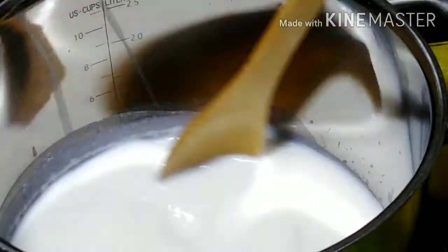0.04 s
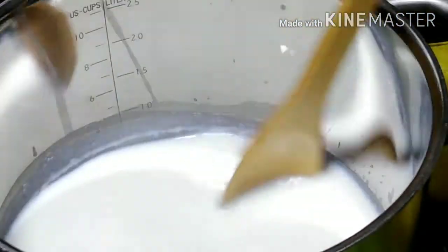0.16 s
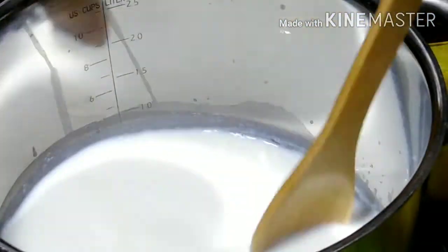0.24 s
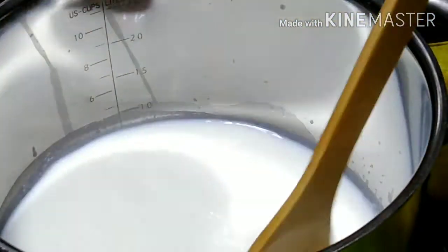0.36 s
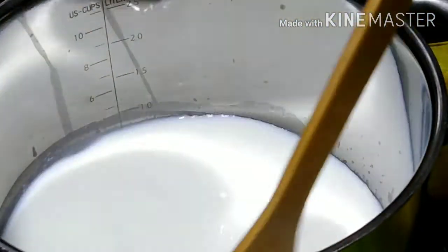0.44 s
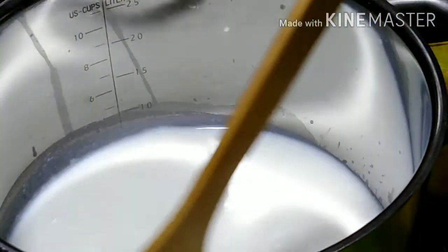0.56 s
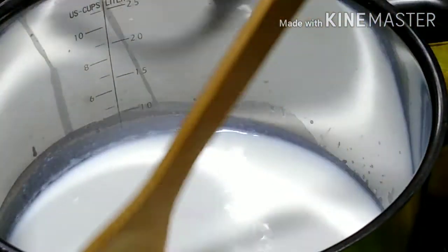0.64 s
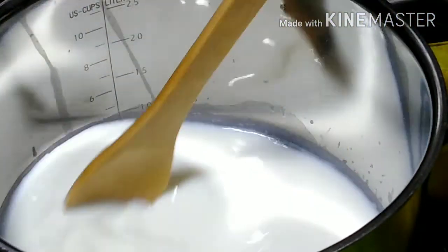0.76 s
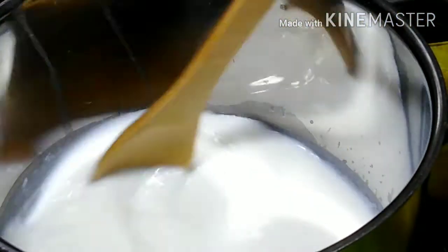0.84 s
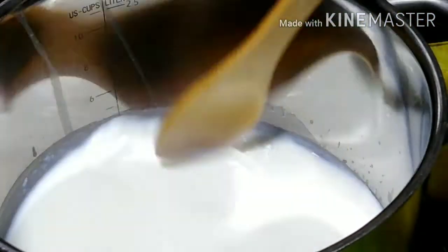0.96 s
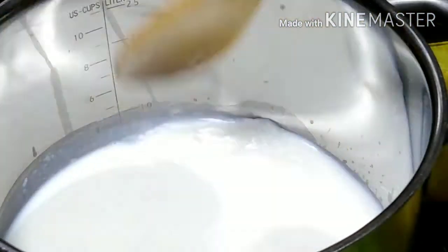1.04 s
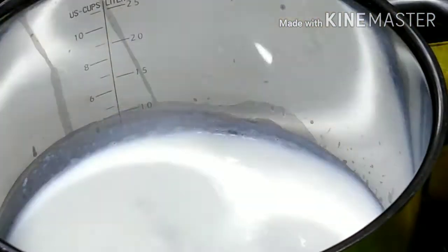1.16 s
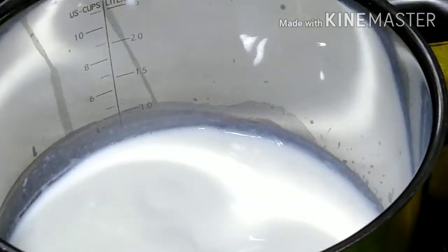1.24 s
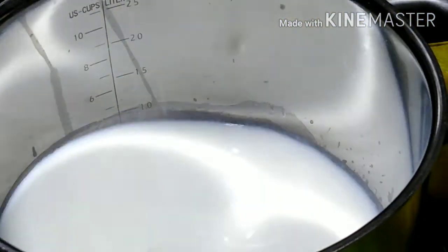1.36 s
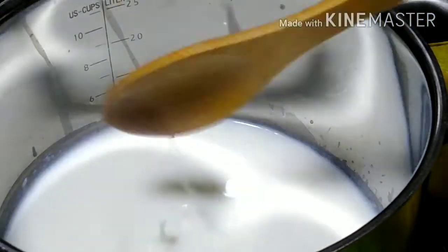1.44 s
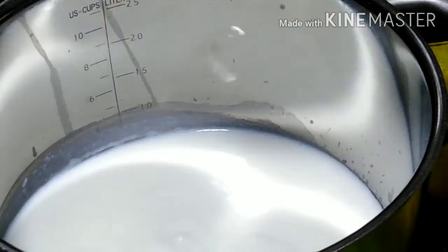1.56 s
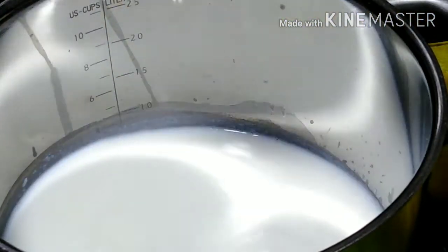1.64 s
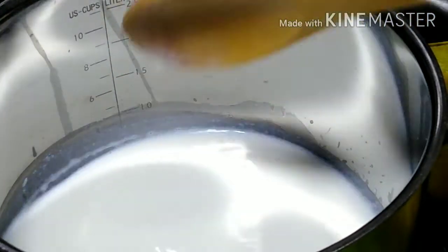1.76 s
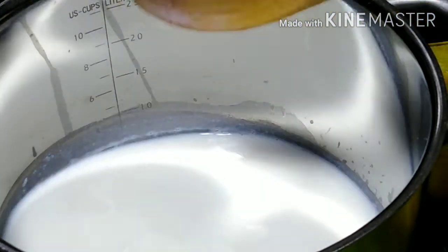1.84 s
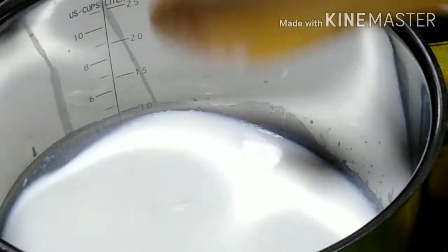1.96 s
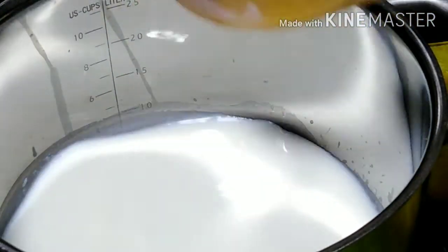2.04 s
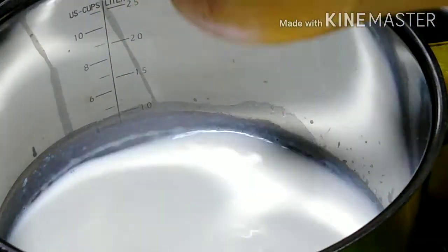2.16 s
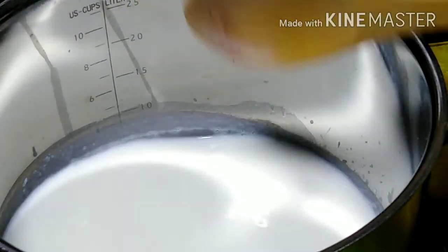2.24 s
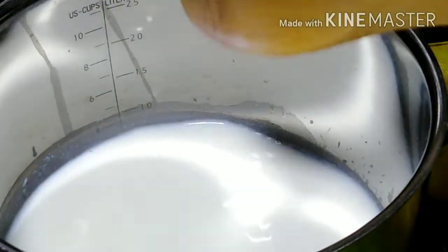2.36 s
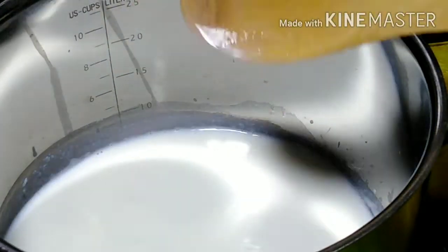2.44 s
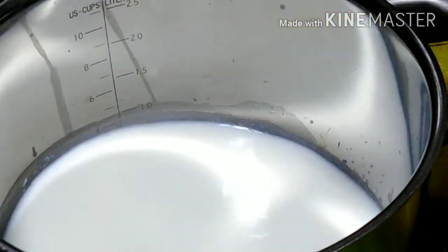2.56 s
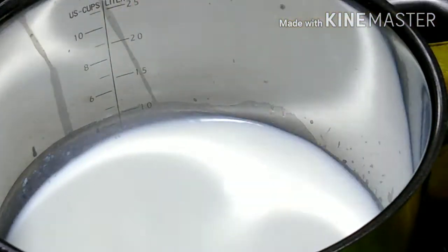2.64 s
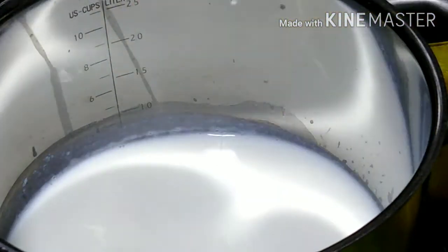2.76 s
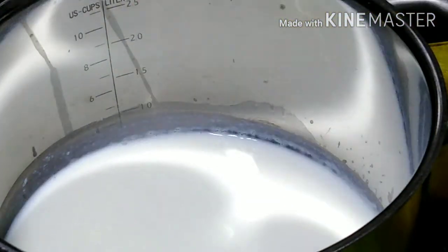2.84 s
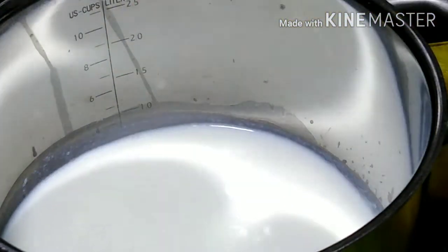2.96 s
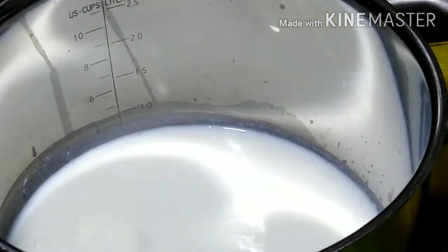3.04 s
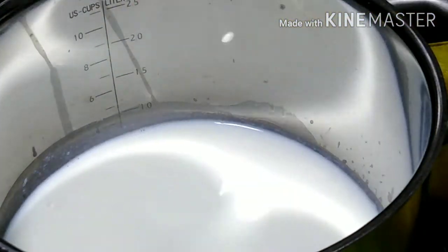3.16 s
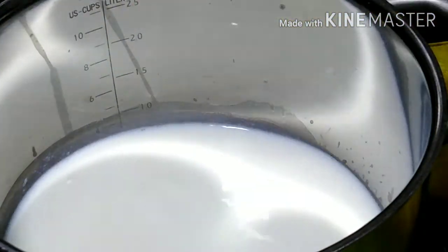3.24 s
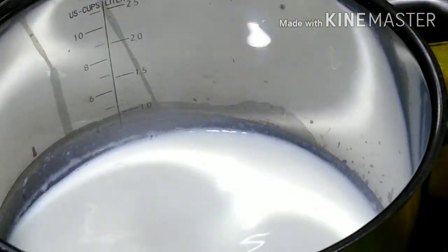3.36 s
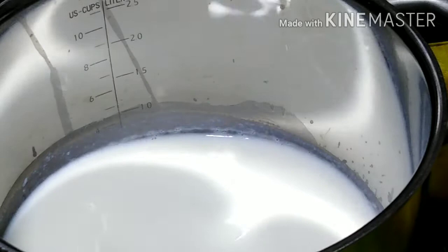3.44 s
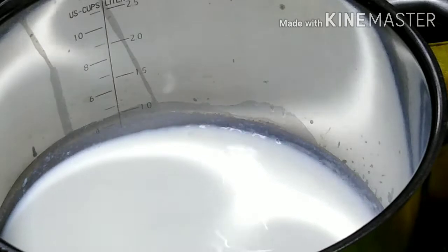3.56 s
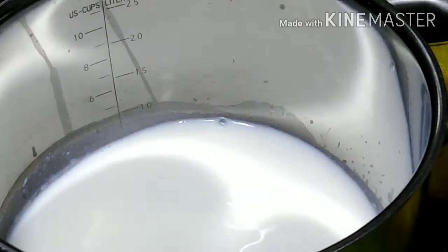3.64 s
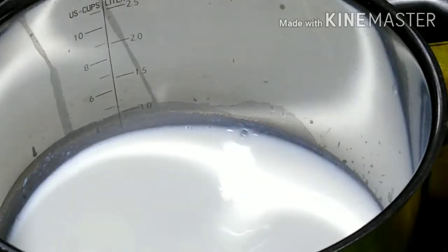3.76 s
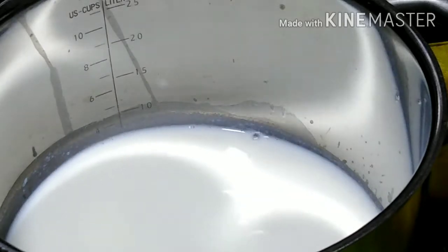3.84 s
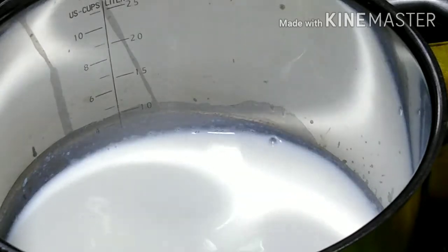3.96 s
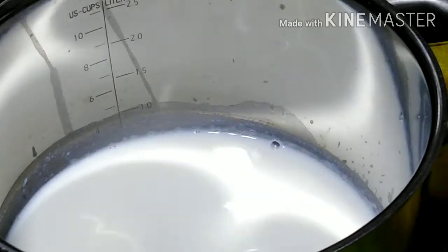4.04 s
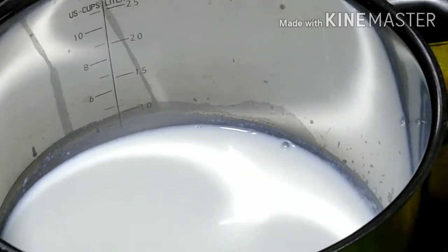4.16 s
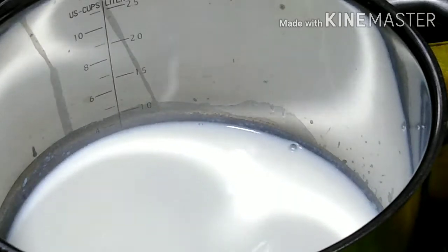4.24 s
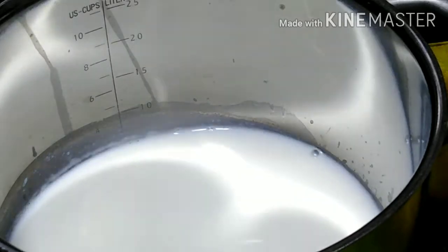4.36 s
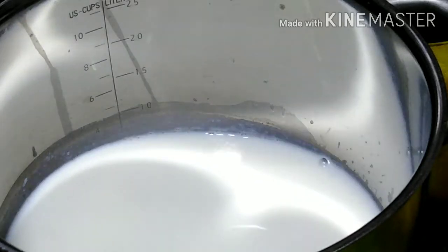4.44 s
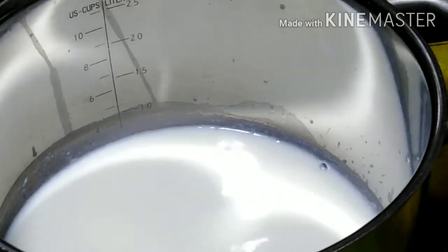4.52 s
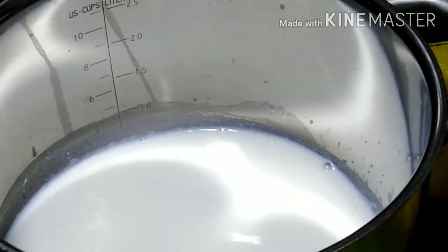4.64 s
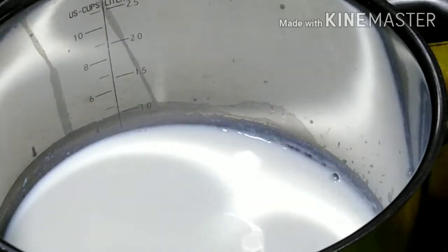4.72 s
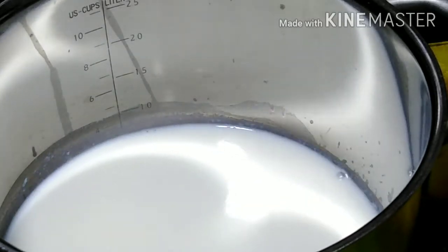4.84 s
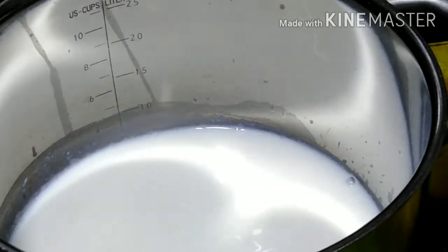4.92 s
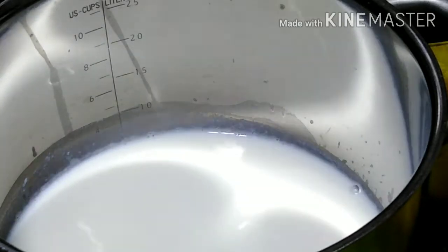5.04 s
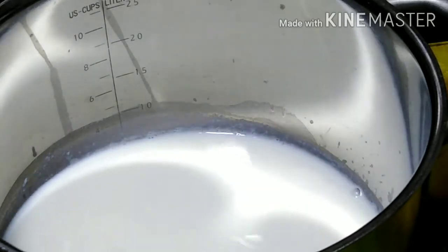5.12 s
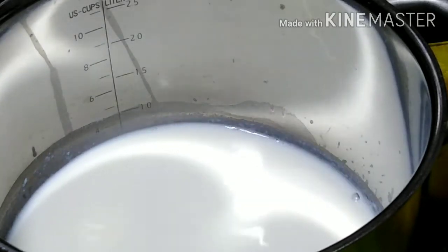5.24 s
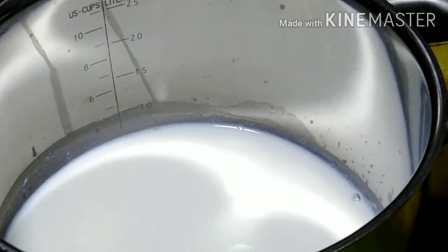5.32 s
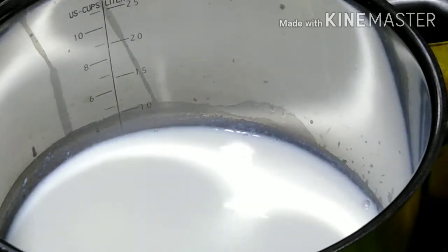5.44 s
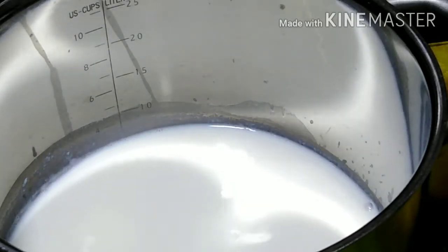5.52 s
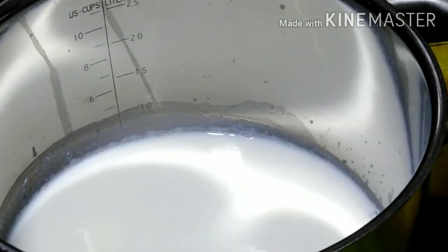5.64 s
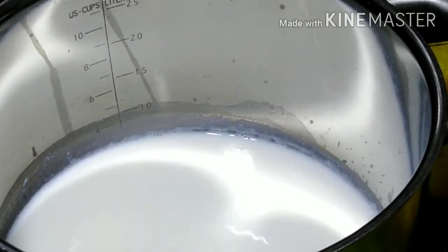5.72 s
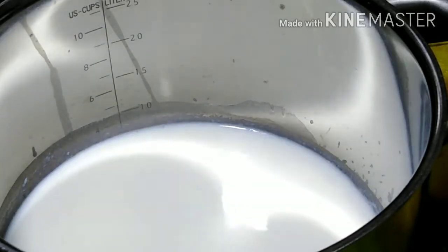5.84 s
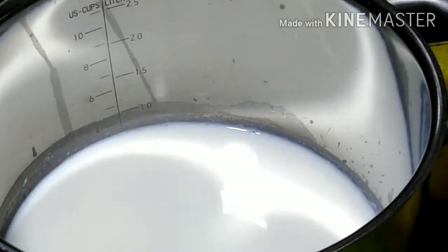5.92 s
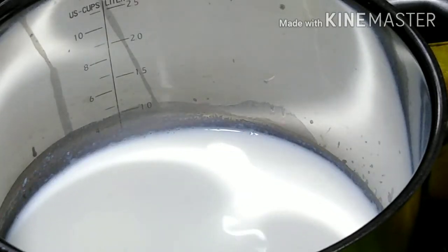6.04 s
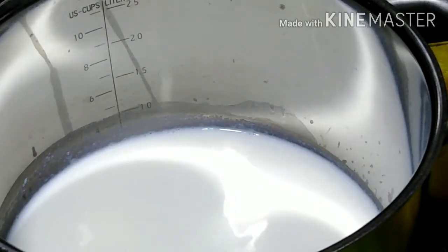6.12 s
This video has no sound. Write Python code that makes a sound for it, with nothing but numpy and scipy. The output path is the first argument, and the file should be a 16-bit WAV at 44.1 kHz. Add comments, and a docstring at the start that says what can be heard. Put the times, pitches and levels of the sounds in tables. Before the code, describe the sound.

A quiet kitchen stove heard close up in stereo, with a short room echo. A low machine drone throbs about twenty times a second throughout, slightly stronger in the first two seconds, while a thin whistle around 5.6 kHz wavers and flickers over soft air. A wooden spoon knocks a steel pot at about 0, 0.17 and 0.3 seconds, duller at first, then brighter and more ringing at 0.8, 1.0, 1.3 to 1.4, 1.6 and 1.8 to 1.9, with a faint last tap at 2.4. Drops fizz very briefly around 0.15 and again at 1.2 to 1.6; tiny high clinks appear near 1.2 to 1.3, and fainter ones before 2. From 2.6 to 3.9 the spoon scrapes in small gritty touches, sharpest with a click at 3.0, another at 3.65. Afterwards mainly drone and whistle remain, with faint blurred tones and one barely audible knock at 5.7.

```python
"""Knocks of a wooden spoon on a steel pot of milk, drops that fizz on the lit stove, then the spoon scraped and laid down.
A low machine drone throbs through the kitchen, and a thin whistle near the burner wavers the whole time.
Knocks and clinks are decaying sines, with thud and tick noise on the pot; fizzes and scrapes are swells cut from noise.
The drone is noise with fuzzy tones, the whistle a wandering sine mixed with narrow noise; soft air lies behind."""
import sys
import numpy as np
from scipy import signal
from scipy.fft import rfft, irfft
from scipy.io import wavfile
from scipy.ndimage import uniform_filter1d

SR = 44100
rng = np.random.default_rng(int(sys.argv[2]) if len(sys.argv) > 2 else 0)


def inscribe(sig):
    """Save sig as 16-bit PCM at rate SR to the path in sys.argv[1].

    A 1-D sig is mono; a 2-D sig holds one channel per row.
    Samples are clipped to [-1, 1] before scaling.
    """
    pcm = np.round(np.clip(np.atleast_2d(sig).T, -1, 1) * 32767)
    wavfile.write(sys.argv[1], SR, pcm.astype(np.int16))


N = 272802

# Spoon blows on the pot. Each row: time in seconds, level in dB, lowest modes in dB, upper modes in dB,
# left-right difference in dB.
KNOCKS = [(.004, -57.5, -6, -25, 14), (.17, -42, 2, -47, 0), (.297, -53, -1, -26, -4),
          (.7755, -47, 3, 5.5, -2.5), (1.005, -49.5, -3.5, -12, -5), (1.3135, -47, 6.5, 5.5, -1.5),
          (1.3865, -49, 1.5, 4, -0.5), (1.628, -50, -3.5, -7.5, 3.5), (1.816, -64, -5, 4, -12),
          (1.826, -43, -9, -15, 2), (1.893, -49, -12, -12, 0), (2.387, -57, -6, -30, 0),
          (5.735, -64.5, -11, -20, 15)]
# Modes of the steel pot. Each row: frequency in Hz, level in dB, t60 in seconds before the blow scales it.
POT_MODES = [(473, 1.5, 0.18), (749, -4, 0.27), (766, -11, 0.2), (794, -8.5, 0.28), (910, 2.5, 0.06),
             (962, -6, 0.054), (993, -14, 0.14), (1288, -2, 0.092), (1517, 7.5, 0.11), (1600, -22, 0.091),
             (1777, 1.5, 0.095), (1686, -9.5, 0.14), (1990, 4, 0.04), (2070, 3, 0.059), (2138, 2, 0.034),
             (2173, -1, 0.072), (2256, -12, 0.16), (2700, -15.5, 0.087), (2980, -21, 0.095),
             (3330, -8.5, 0.094), (3460, -19, 0.1), (3560, -17, 0.082), (5060, -20, 0.078),
             (5840, -11.5, 0.069)]
# Spectrum of the wooden thud. Each row: frequency in Hz, density in dB per Hz.
WOOD_SPECTRUM = [(400, -11), (700, 13.5), (1100, -7), (2100, -11), (2500, -12), (3500, -9), (4200, -38),
                 (5200, -9), (7000, -47)]
SOFT_RISE_S, HARD_RISE_S = 0.0045, 0.0031  # blows rich in upper modes start faster
SOFT_RING, HARD_RING = 0.51, 0.88  # and ring longer: factors on the t60 of the pot
CRACK_DB, CRACK_T60_S = -10, 0.023  # tick of first contact, relative to the upper modes

# Short bright fizzes of the drops. Each row: time in seconds, level in dB, length in seconds,
# tilt in dB per octave.
FIZZES = [(.113, -60, .02, -2), (.13, -48, .045, -2.5), (.165, -53, 0.0093, -12), (1.203, -70, 0.029, -1),
          (1.25, -66, 0.056, -6), (1.476, -51.5, .02, 4), (1.492, -51, 0.031, -4),
          (1.544, -45.5, 0.02, -5.5), (1.585, -62.5, .04, -4)]
# Spectrum of the fizz before tilt and bend. Each row: frequency in Hz, density in dB per Hz.
FIZZ_SPECTRUM = [(1500, -29), (2200, -27), (3000, -7), (3600, -11), (4300, -3), (5000, -1), (5900, -14),
                 (6600, 6.5), (9000, 2), (12500, 1), (14400, 0)]
# Envelope of a fizz: rise and tail t60 as multiples of the length, bend in dB per octave squared.
FIZZ_SHAPE = 0.41, 6.25, -0.6

# The spoon dragged and set down. Each row: time in seconds, level in dB, length in seconds,
# tilt in dB per octave.
SCRAPES = [(2.57, -72.5, 0.075, 7.5), (2.855, -70, 0.1, -0.5), (2.955, -61.5, 0.043, 6),
           (2.986, -46.5, 0.0012, -1), (2.996, -52.5, 0.032, -5.5), (3.039, -58.5, 0.052, 1),
           (3.12, -65, 0.054, 2.5), (3.225, -65.5, 0.046, 7), (3.258, -58, 0.032, 4.5),
           (3.375, -75.5, 0.031, 5), (3.645, -55.5, 0.036, -6), (3.75, -70, 0.037, 4),
           (3.895, -75, 0.016, -1.5)]
# Spectrum of the friction before tilt and bend. Each row: frequency in Hz, density in dB per Hz.
SCRAPE_SPECTRUM = [(530, -56), (900, -7), (1200, -10), (1420, -0.5), (1610, -12), (2100, -3), (2800, 0),
                   (4630, -4), (5570, -18), (6260, -2), (8460, -4.5), (9400, -15.5), (13600, -19),
                   (14400, -41)]
# Envelope of a scrape: rise and tail t60 as multiples of the length, bend in dB per octave squared.
SCRAPE_SHAPE = 0.29, 8.3, 2.7
# Resonances the scrape rings in. Each row: frequency in Hz, width of each smoothing pass in Hz,
# relative level in dB.
BOARD_RESONANCES = [(1402, 35, -19), (2094, 97, 12.5), (2920, 130, -15), (3295, 35, 6.5), (4240, 90, -33),
                    (5200, 74, 3), (7030, 82, -1), (7600, 100, 3)]
GRIT_DB, GRIT_S = 2, 0.003  # crackle of the friction: rms swing, time scale

# Faint high clinks. Each row: time in seconds, level in dB, extra level of the highest modes in dB.
CLINKS = [(1.2074, -61.5, -13), (1.2316, -60, -15), (1.253, -60, -10), (1.299, -62.5, -14),
          (1.7355, -71, -22), (1.971, -68.5, -7)]
# Modes all clinks share. Each row: frequency in Hz, relative level in dB, t60 in seconds.
CLINK_MODES = [(6430, -6, 0.079), (6940, -19, 0.084), (7500, -19, .1), (8660, -3.5, 0.044),
               (10200, -3, 0.074), (10500, -1, 0.064), (10440, -18, .15), (10800, -14, 0.13),
               (12550, 0, 0.13), (12900, 8, 0.069), (13800, 4, 0.11), (14050, -2, 0.17)]
# Faint short blurred tones; the low ones are brief swells at the drone's upper edge.
# Each row: time in seconds, level in dB, centre pitch in Hz.
BLURRED_TONES = [(.165, -47, 6200), (3.001, -54, 1421), (3.1, -64, 694), (3.75, -64, 3390),
                 (4.15, -54, 620), (4.4, -53.5, 610), (4.98, -59, 6380), (5.19, -67, 715), (5.26, -70, 704),
                 (5.67, -65.5, 704), (6.05, -62, 1143), (6.1, -56, 714.4), (6.16, -67, 1170)]
# Ring time of the blurred tones. Each row: frequency in Hz, t60 in seconds.
BLURRED_T60 = [(650, 0.26), (1160, 0.086), (1400, 0.15), (6300, 0.084)]
BLUR_HZ = 28.2  # random spread of the close sines in each blurred tone

# Spectrum of the drone wash. Each row: frequency in Hz, density in dB per Hz.
DRONE_SPECTRUM = [(28, -18), (48, -26), (66, -12), (100, -8), (130, -4), (160, -12), (290, -15), (330, -19),
                  (385, -13), (440, -18), (520, -12), (600, -19), (660, -36), (780, -52), (1100, -70)]
# Level of the wash before it throbs. Each row: time in seconds, level in dB.
DRONE_LEVEL = [(0, -47.5), (1.9, -47), (2.2, -50.5), (3, -49), (4, -50), (5.3, -49), (6.19, -49)]
# Likeness of the drone in the two channels. Each row: frequency in Hz, likeness from 0 to 1.
DRONE_LIKENESS = [(60, 1), (130, 0.94), (280, 0.81), (620, 0.75), (1350, 0.17), (2950, 0.05), (6420, 0.24),
                  (14000, 0.022)]
# Fuzzy tones in the drone. Each row: frequency in Hz, width of each smoothing pass in Hz, rms level in dB.
DRONE_TONES = [(77.37, 2.72, -52.5), (98.2, 6.1, -59.5), (120, 6.3, -57), (124.18, 3.97, -54),
               (264.2, 8.5, -67), (299.5, 3.8, -68.5), (373.5, 3.34, -66.5), (391.8, 5.1, -62),
               (497, 4.5, -74), (484, 5.4, -71.5), (518, 6, -73.5), (531, 4.6, -71), (610, 8.3, -79)]
THROB_HZ, THROB_DEPTH = 19.45, 0.29  # the wash beats once per turn of the machine
THIRD_ORDER_DB = -50.5  # peak of a clean tone at three times the turning rate

# Path of the whistle. Each row: time in seconds, pitch in Hz before it wanders,
# level in dB before flicker and left-right balance.
WHISTLE = [(0, 5640, -68), (.2, 5590, -62), (.3, 5580, -75.5), (.56, 5600, -77.5), (.66, 5640, -63),
           (1.0, 5650, -68.5), (1.14, 5600, -76.5), (1.28, 5600, -64), (1.52, 5500, -71), (1.75, 5590, -62),
           (2.2, 5590, -67.5), (2.55, 5560, -80), (2.72, 5620, -70.5), (3.12, 5560, -69.5),
           (3.21, 5540, -76), (3.3, 5560, -55.5), (3.48, 5680, -74.5), (3.63, 5590, -60.5),
           (3.8, 5520, -86), (3.92, 5670, -66), (4.2, 5610, -74.5), (4.3, 5770, -77), (4.62, 5720, -65.5),
           (4.95, 5650, -62.5), (5.3, 5730, -68), (5.5, 5760, -63.5), (5.75, 5650, -62.5),
           (6.19, 5560, -62.5)]
# Fainter strands beside the whistle. Each row: frequency in Hz, width of each smoothing pass in Hz,
# level in dB relative to the whistle path, swing in dB.
STRANDS = [(5480, 73, -25, 15.5), (5984, 81, -23, 12)]
# Short narrow noise tones, mostly just below the whistle, one faint and high.
# Each row: start in seconds, length in seconds, frequency in Hz, level in dB before fades and left-right balance.
NARROW_TONES = [(1.265, 0.56, 5430, -82), (2.493, 0.048, 5340, -73.5), (2.948, 0.24, 5470, -70),
                (3.247, 0.26, 5470, -76), (4.419, .33, 5465, -70.5), (4.9, 0.11, 5090, -79),
                (5.13, 0.19, 5390, -74.5), (5.24, 0.21, 5490, -75), (5.377, 0.13, 5410, -75),
                (5.678, .14, 5070, -82), (5.82, 0.39, 10900, -86)]
WANDER_HZ, WANDER_S = 24.98, 0.0519  # quick unsteadiness of the pitch: rms swing, time scale
FLICKER_DB, FLICKER_S = 3.5, 0.036  # quick level changes: rms swing, time scale
STRAND_S = 0.13  # time scale on which a strand comes and goes

# Spectrum of the background air. Each row: frequency in Hz, density in dB per Hz.
AIR_SPECTRUM = [(500, -2), (800, -4), (1250, -2.5), (1600, -6), (3400, -13), (5000, -12), (5700, -5),
                (6700, -14), (13000, -16), (14400, -19.5)]
AIR_DB = -74.5  # rms

# Colour of the microphone pair. Each row: frequency in Hz, left-right difference in dB.
PORTS = [(60, -1.5), (110, -0.5), (200, 1), (370, 2), (680, 4.5), (1240, 0), (2270, -4), (4170, 5.5),
         (7630, 7.5), (14000, -16)]
EDGE_HZ = 14250  # upper band limit


def pot():
    """Each knock rings the same modes over a wooden thud; place and hardness set the low and high shares."""
    out, t = np.zeros((2, N)), np.arange(SR // 2) / SR
    hz, db, t60 = np.transpose(POT_MODES)
    wood = noise(WOOD_SPECTRUM, 0.61, size=256, uneven_db=0.5)
    for s, level_db, low_db, high_db, pan_db in KNOCKS:
        rise = np.interp(high_db, [-10, 6], [SOFT_RISE_S, HARD_RISE_S])
        ring_factor = np.interp(high_db, [-14, 4], [SOFT_RING, HARD_RING])
        share_db = np.interp(hz, [1000, 1500, 1900], [low_db, 0, high_db])
        modes = np.transpose([hz, db + share_db, t60 * ring_factor])
        blow = ring(modes, rise, spread_db=1.5, apart=0.62)

        grain = wood[:, round(s * SR):][:, :len(t)]
        thud_db = max(high_db, low_db - 7.0) - 3.5
        thud = amp(thud_db - 60 * t / 0.23) * (1 - np.exp(-t / 0.02))
        blow[:, :grain.shape[1]] += grain * thud[:grain.shape[1]]

        tick = resonate(rng.standard_normal((2, len(t))), 4600, 2200.0)
        tick_shape = amp(high_db + CRACK_DB - 60 * t / CRACK_T60_S) * np.minimum(t / rise, 1)
        blow += tick_shape * tick

        sides = amp([[level_db + pan_db / 2], [level_db - pan_db / 2]])
        add(out, max(s - rise, 0), blow * sides)
    return out


def fizzes():
    """Drops fizz as short swells of bright noise."""
    hiss = noise(FIZZ_SPECTRUM, 0.071, size=1024, uneven_db=7.0)
    return bursts(FIZZES, FIZZ_SHAPE, hiss, 6800)


def scrapes():
    """The dragged spoon is heard as swells of gritty friction."""
    return bursts(SCRAPES, SCRAPE_SHAPE, scrape_texture(), 4500)


def scrape_texture():
    """Friction noise, uneven in time and frequency, part of it ringing in the wood underneath."""
    rub = noise(SCRAPE_SPECTRUM, 0.077, size=1024, uneven_db=4.5)
    white = rng.standard_normal((2, N))
    rung = sum(amp(db) * evened(resonate(white, hz, width)) for hz, width, db in BOARD_RESONANCES)
    return (rub + 0.51 * evened(rung)) * amp(GRIT_DB * drift(GRIT_S))


def bursts(rows, form, texture, centre_hz):
    """Cuts swells with a rise, a hold and a dying tail out of a texture; one shape, scaled by the length."""
    out, t = np.zeros((2, N)), np.arange(SR // 2) / SR
    octaves = np.log2((np.fft.rfftfreq(len(t), 1 / SR) + 100) / centre_hz)
    rise_share, tail_share, bend_db = form
    for s, level_db, length, tilt_db in rows:
        start = rng.integers(0, N - len(t))
        colour = amp(tilt_db * octaves - bend_db * octaves ** 2)
        part = irfft(rfft(texture[:, start:start + len(t)]) * colour, len(t))

        rise = np.clip(rise_share, 0.05, 1) * length
        swell = np.sin(np.pi / 2 * np.clip(t / rise, 0, 1)) ** 2
        tail = amp(-60 * np.maximum(t - length, 0) / (tail_share * length))
        shape = swell * tail
        burst = evened(part * shape) * np.sqrt(np.mean(shape ** 2))
        add(out, s - rise / 2, amp(level_db) * burst)
    return out


def clinks():
    """Faint high clinks, decaying sines that share one set of modes."""
    out = np.zeros((2, N))
    hz, db, t60 = np.transpose(CLINK_MODES)
    for s, level_db, top_db in CLINKS:
        modes = np.transpose([hz, db + level_db + top_db * (hz > 12000), t60])
        add(out, s, ring(modes, rise=0.0012, spread_db=2.5, apart=1.3))
    return out


def blurred_tones():
    """Faint short tones, each a cluster of four decaying sines close in pitch."""
    out = np.zeros((2, N))
    for s, level_db, centre_hz in BLURRED_TONES:
        t60 = read(BLURRED_T60, centre_hz)
        pitches = centre_hz + BLUR_HZ * rng.standard_normal(4)
        cluster = [(pitch, level_db, t60) for pitch in pitches]
        add(out, s, ring(cluster, rise=0.008, spread_db=2.0, apart=0.6))
    return out


def drone():
    """A low throbbing wash that fades out above 600 Hz, with fuzzy tones standing out of it."""
    likeness = read(DRONE_LIKENESS, np.fft.rfftfreq(4096, 1 / SR))
    turns = THROB_HZ * np.arange(N) / SR + rng.random()
    wash = noise(DRONE_SPECTRUM, likeness, size=4096, uneven_db=2.5)
    out = wash * amp(curve(DRONE_LEVEL)[0]) * (1 + THROB_DEPTH * np.cos(2 * np.pi * turns))
    for hz, width, db in DRONE_TONES:
        left, other = rng.standard_normal((2, N))
        same = np.clip(read(DRONE_LIKENESS, hz), 0, 1)
        right = same * left + np.sqrt(1 - same ** 2) * other
        out = out + amp(db) * evened(resonate(np.array([left, right]), hz, width))
    return out + amp(THIRD_ORDER_DB) * np.sin(2 * np.pi * 3 * turns)


def whistle():
    """A thin tone, part sine and part narrow noise, drifts and flickers; fainter strands come and go beside it."""
    pitch, level_db = curve(WHISTLE)
    pitch = pitch + WANDER_HZ * drift(WANDER_S)
    cycles = np.cumsum(pitch) / SR + rng.random((2, 1))
    clear = np.sqrt(2) * np.cos(2 * np.pi * cycles)
    breathy = evened(resonate(rng.standard_normal((2, N)), pitch, 73.0))
    out = (0.34 * clear + 0.6 * breathy) * amp(FLICKER_DB * drift(FLICKER_S))
    for hz, width, db, swing_db in STRANDS:
        presence_db = db + swing_db * np.minimum(drift(STRAND_S), 1)
        strand = evened(resonate(rng.standard_normal((2, N)), hz, width))
        out = out + amp(presence_db) * strand
    out = out * amp(level_db)
    for s, length, hz, db in NARROW_TONES:
        size = round(length * SR)
        tone = resonate(rng.standard_normal((2, SR))[:, :size], hz, 80.0)
        add(out, s, amp(db) * evened(tone) * signal.windows.tukey(size, 0.4))
    return out * amp([[4.0], [-1.5]])  # left and right balance in dB


def air():
    """Soft background noise, nearly independent in the two channels."""
    return amp(AIR_DB) * noise(AIR_SPECTRUM, 0.037, size=1024, uneven_db=3.0)


def room(x):
    """Sparse taps of random sign, dying away; other taps for each port."""
    slots = np.arange(200, SR // 2 - 20, 20)
    at = slots + rng.integers(0, 20, (2, len(slots)))
    echoes = rng.choice([-1.0, 1.0], at.shape) * amp(-60 * at / SR / 0.3)  # t60 of 0.3 s
    taps = np.zeros((2, SR // 2))
    np.put_along_axis(taps, at, echoes, 1)
    return signal.fftconvolve(x, taps / np.linalg.norm(taps[0]), axes=1)[:, :N]


def ring(modes, rise, spread_db, apart):
    """Decaying sines; mode levels vary a little every time and the ports hear them out of step."""
    hz, db, t60 = np.transpose(modes)[:, :, None]
    t = np.arange(SR // 2) / SR
    start, skew, luck = rng.standard_normal((len(modes), 1, 3)).transpose(2, 0, 1)
    phase = 3 * start + apart * np.array([skew, -skew])
    size = amp(db + spread_db * luck - 60 * t / t60)
    onset = (1 - np.exp(-t / rise)) ** 2
    return (size * np.sin(2 * np.pi * hz * t + phase)).sum(1) * onset


def resonate(x, hz, width):
    """Shifts hz down to zero, smooths twice and shifts back: a steep resonance."""
    turn = np.exp(2j * np.pi * np.cumsum(hz * np.ones(x.shape[-1])) / SR)
    r = np.exp(-np.pi * width / SR)
    smooth = signal.lfilter([(1 - r) ** 2], [1, -2 * r, r * r], x / turn)
    return 2 * (turn * smooth).real


def noise(spectrum, same, size, uneven_db):
    """Two-channel noise of a given spectrum and likeness, uneven in time and frequency."""
    frames, hz = 4 * N // size + 5, np.fft.rfftfreq(size, 1 / SR)
    a, b, c, d, swing = rng.standard_normal((frames, len(hz), 5)).T
    swing = uniform_filter1d(swing, size=5, axis=0)  # over frequency
    swing = evened(uniform_filter1d(swing, size=5, axis=1))  # over time
    same = np.clip(same * np.ones(len(hz)), -1, 1)[:, None]
    left, other = a + 1j * b, c + 1j * d
    bins = np.array([left, same * left + np.sqrt(1 - same ** 2) * other])
    bins *= amp(read(spectrum, hz)[:, None] + uneven_db * swing)
    return evened(signal.istft(bins, nperseg=size, noverlap=3 * size // 4)[1][:, :N])


def drift(seconds):
    """Smoothed chance of rms 1 that changes over the given time."""
    size = max(round(seconds * SR), 2)
    return evened(uniform_filter1d(uniform_filter1d(rng.standard_normal(N), size), size))


def amp(db):
    """Decibels to a linear factor."""
    return 10 ** (np.asarray(db) / 20)


def evened(x):
    """Scales a signal to rms 1."""
    return x / np.sqrt(np.mean(x ** 2) + 1e-20)


def read(points, hz):
    """Reads a table over frequency, straight between points on a log axis."""
    f, value = np.transpose(points)
    return np.interp(np.log(hz + 1), np.log(f + 1), value)


def curve(rows):
    """Columns of a table over time, one value per sample."""
    s, *columns = np.transpose(rows)
    return [np.interp(np.arange(N) / SR, s, c) for c in columns]


def add(mix, s, sound):
    """Lays a sound into the mix at s seconds, cut off at the end."""
    part = mix[:, round(s * SR):][:, :sound.shape[1]]
    part += sound[:, :part.shape[1]]


def scene():
    """Knocks, clinks and blurred tones are given room echo; the port colour shapes all but the air."""
    ringing = pot() + clinks() + blurred_tones()
    sources = ringing + amp(-5.5) * room(ringing) + fizzes() + scrapes() + drone() + whistle()
    tilt_db = read(PORTS, np.fft.rfftfreq(2 * N, 1 / SR)) / 2  # the two ports colour the room differently
    coloured = irfft(rfft(sources, 2 * N) * amp([tilt_db, -tilt_db]))[:, :N]
    return coloured + air()


def record(dry):
    """The microphone cuts the deep bass; then the band limit."""
    bass_cut = signal.butter(3, 50, "highpass", fs=SR, output="sos")
    thin = signal.sosfilt(bass_cut, dry)
    band_limit = signal.firwin(767, EDGE_HZ, window=("kaiser", 9), fs=SR)
    return signal.oaconvolve(thin, band_limit[None], "same")


dry = scene()
out = record(dry)
inscribe(out)
```